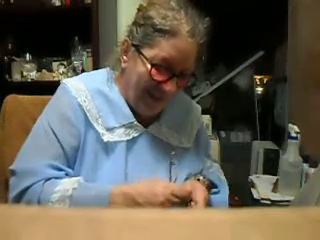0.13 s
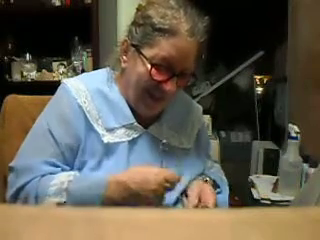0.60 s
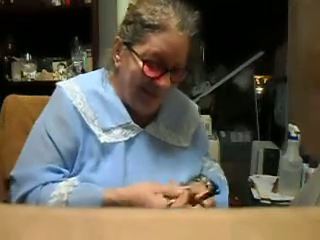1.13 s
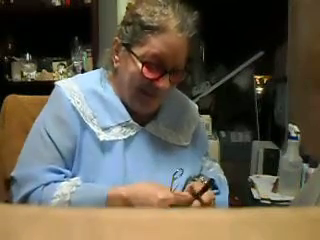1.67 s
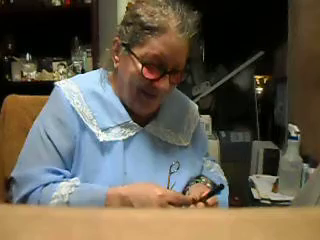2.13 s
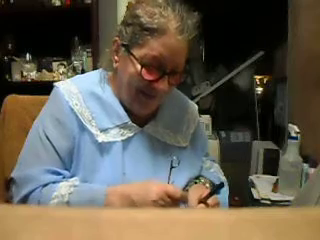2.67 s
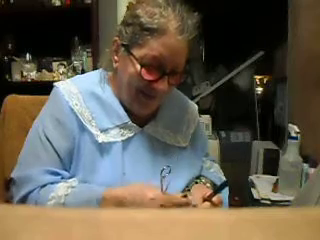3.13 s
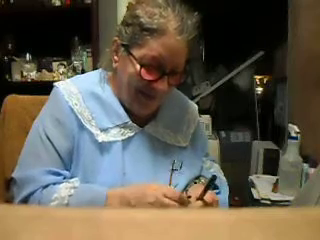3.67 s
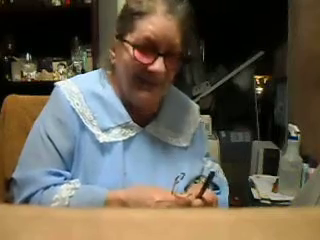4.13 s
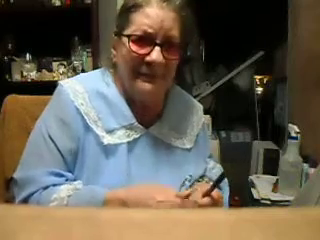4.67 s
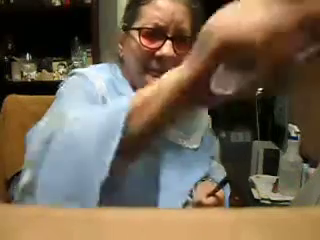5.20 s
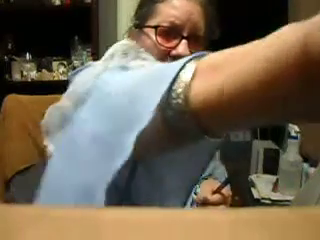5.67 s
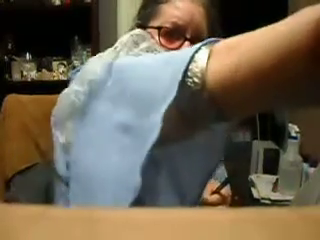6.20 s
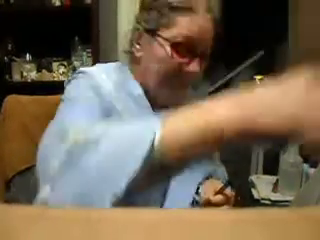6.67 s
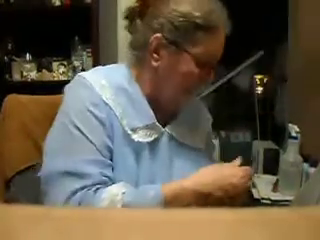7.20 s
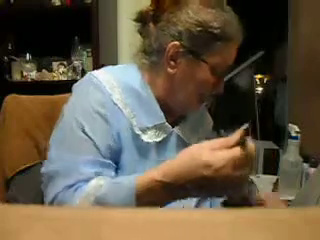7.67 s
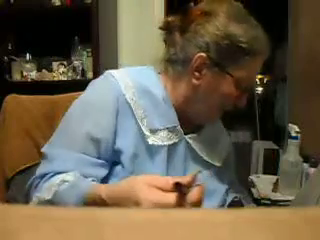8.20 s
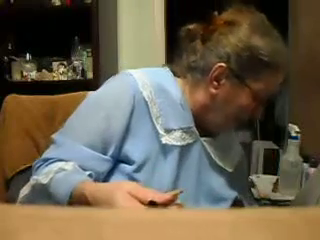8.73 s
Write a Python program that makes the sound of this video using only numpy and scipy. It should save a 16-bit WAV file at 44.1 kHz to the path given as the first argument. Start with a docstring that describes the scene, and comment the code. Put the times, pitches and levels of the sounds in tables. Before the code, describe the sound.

A quiet indoor room with a faint, fast, uneven clock tick, low hum and soft hiss. At a table, one crisp scissor snip stands out near the start, followed by sparse, tiny plastic snaps and faint crinkles. Later a small button clicks, fingers scrape the camera's casing, and a loud hollow knock rattles briefly against the microphone. Only the ticking and a few faint plastic sounds remain.

```python
"""A quiet room, heard through a camera's microphone: a pendulum clock ticks unevenly from start to end.
First, on a table, small scissors snip and stiff plastic crinkles, in splinters and dense tiny cracks of noise.
Then a button clicks and a hand reaches for the camera: fingers rub its shell, which rings, knocks hard and
rattles to rest; the gain control dips and creeps back. A few faint plastic sounds follow.
Appliance hum, electronic whine, room rumble and preamplifier hiss lie below throughout."""
import sys
import numpy as np
from scipy import signal
from scipy.fft import rfft, irfft, next_fast_len
from scipy.io import wavfile
from scipy.ndimage import uniform_filter1d

SR = 44100
rng = np.random.default_rng(int(sys.argv[2]) if len(sys.argv) > 2 else 0)


def dump(signal):
    """Clip the signal to [-1, 1] and save it as 16-bit WAV at the path in sys.argv[1]."""
    limited = np.clip(np.atleast_2d(signal).T, -1, 1)
    pcm = np.round(limited * 32767).astype(np.int16)
    wavfile.write(sys.argv[1], SR, pcm)


def level_to_linear(level):
    """Convert decibel levels to linear amplitude factors, elementwise."""
    exponent = np.asarray(level, float) / 20
    return 10 ** exponent


N = 389403  # samples

# Clearest snips and plastic snaps at the table, before room and microphone.
# Each row: start in seconds, peak of the bright band in dB, centre of that band in Hz.
TABLE_SNAPS = [(0.0427, -46, 8250), (0.3962, -17, 9400), (0.4092, -35, 8690), (0.4316, -36, 7300),
               (0.4682, -39, 8000), (1.5277, -51.5, 6030), (1.7519, -50.5, 7350), (1.7938, -52, 8600),
               (1.8543, -40.5, 9100), (1.8873, -45.5, 7900), (1.94, -50, 6460), (2.0108, -52, 9500),
               (2.1382, -39.5, 8460), (2.3493, -50.5, 7700), (2.4254, -46, 9350), (2.4586, -49, 8650),
               (2.7015, -47, 8850), (2.7806, -35.5, 8600), (2.88, -41.5, 8750), (3.0433, -53, 7560),
               (3.8186, -50, 7800), (4.2804, -51, 7800), (4.3879, -52, 8540), (4.4275, -44.5, 6900),
               (6.7017, -45.5, 7820), (7.8394, -46.5, 8870)]
# Swells of plastic crinkling between the fingers.
# Each row: start in seconds, length in seconds, level of the brightest part in dB.
CRINKLE_SWELLS = [(0, 0.14, -76), (.4, 0.1, -58), (1.69, 0.25, -69), (1.94, 0.28, -79), (2.33, 0.3, -78),
                  (2.65, 0.27, -81), (3.02, 0.029, -80), (3.78, 0.029, -74), (4.09, 0.05, -72.5),
                  (4.27, 0.08, -63), (4.38, 0.11, -76), (7.87, 0.38, -81.5)]
# Blows on the camera shell.
# Each row: start in seconds, relative strength in dB, hard crack relative to the blow in dB.
SHELL_BLOWS = [(5.7943, -48, -7), (6.1027, -42, -12), (6.24, -36.5, -7), (6.3652, -34, -9.5),
               (6.3973, -7, -6.5), (6.4150, -20, -25.5), (6.4577, -33.5, -22.5), (6.4741, -14.5, -15),
               (6.4814, -25, -16), (6.4895, -25, -16), (6.4977, -16, -20), (6.5224, -13.5, -13),
               (6.5500, -15, -23), (6.5655, -16.5, -17), (6.578, -33, -17), (6.5860, -24.5, -31),
               (6.6084, -36, -6)]
# Fingers rubbing the shell, one stroke a row.
# Each row: start in seconds, length in seconds, grains that ring the shell in dB, scraping rasp in dB.
FINGER_STROKES = [(5.865, 0.099, -81, -46), (5.903, 0.049, -83, -61), (5.93, 0.094, -89, -59),
                  (6.005, 0.045, -77, -39.5), (6.1, 0.12, -81, -76), (6.258, 0.046, -83, -55),
                  (6.31, 0.15, -86.5, -66), (6.475, 0.044, -58, -70), (6.545, 0.068, -63, -65),
                  (6.597, 0.046, -69.5, -66)]
# Ringing modes of the camera shell.
# Each row: frequency in Hz, relative level in dB, time to fall by 60 dB in seconds.
SHELL_MODES = [(153, -10, .06), (235, -4, 0.046), (293, -6, 0.03), (432, -8.5, 0.087), (435.5, -10, 0.055),
               (483, -4, 0.1), (531, -9, .04), (609, 0, 0.03), (712, -3.5, 0.023), (780, 3, 0.025),
               (920, -14.5, 0.03), (1067, -13.5, 0.014), (1410, -14.5, 0.015), (1610, -23, 0.0152),
               (1750, -9.5, 0.012), (2410, -29, 0.023)]
# Ringing modes of the clock case.
# Each row: frequency in Hz, relative level on the tick in dB, relative level on the tock in dB.
CLOCK_MODES = [(2704, 6.5, 2), (3630, -16.5, -33), (4910, -14, -15), (4805, 3, -3), (5750, 5.5, 2),
               (6070, 10.5, -1), (6430, -6, -3), (6880, 9.5, 0.5), (8780, -8.5, 5), (9820, 9, 2.5),
               (10300, -9, 2), (10920, -7, -26)]
# Steady hum of appliances. Each row: frequency in Hz, level before its waver in dB rms.
APPLIANCE_HUM = [(29.6, -69), (119.8, -69), (133.2, -78), (199.2, -77), (266.5, -92), (332.4, -86),
                 (399.7, -78)]
# Whine of the camera electronics. Each row: frequency in Hz, level before its waver in dB rms.
CAMERA_WHINE = [(3934, -82), (7867, -85)]
# Colour of room rumble and preamplifier hiss. Each row: frequency in Hz, relative density in dB per Hz.
AIR_COLOUR = [(6, -16), (10, -0.5), (34, 2.5), (91, -7.5), (130, -9.5), (222, -17.5), (368, -17),
              (403, -16), (440, -19.5), (600, -18.5), (1000, -23), (2000, -29), (3300, -33.5), (5550, -36),
              (8500, -36.5), (10200, -37.5), (11000, -41), (13000, -40.5)]


def rms_one(x):
    """Scales to an rms of 1."""
    return x / np.sqrt(np.mean(x ** 2) + 1e-20)


def peak_one(x):
    """Scales to a peak of 1."""
    return x / np.abs(x).max()


def band(x, low_hz, high_hz):
    """Keeps the band between two frequencies."""
    sos = signal.butter(2, [low_hz, min(high_hz, SR / 2.2)], "band", fs=SR, output="sos")
    return signal.sosfilt(sos, x)


def add(out, start_s, sound):
    """Lays a sound into the mix from its start, cut at the end."""
    i = round(start_s * SR)
    out[i:i + len(sound)] += sound[:N - i]


def swells(rows):
    """Gain that rises smoothly and sinks again for each row of start, length and dB."""
    out = np.zeros(N)
    for start_s, length_s, db in rows:
        add(out, start_s, level_to_linear(db) * signal.windows.tukey(int(length_s * SR), .6))
    return out


def grains(per_s, spread_db):
    """Random clicks of uneven size and either sign, with an rms of 1."""
    sizes = level_to_linear(spread_db * np.minimum(rng.exponential(1, N), 5)) * rng.choice([-1, 1], N)
    return rms_one(sizes * (rng.random(N) < per_s / SR))


def cracks(times, levels_db, decay_s):
    """Short splinters of noise that die away exponentially."""
    out, t = np.zeros(N), np.arange(900) / SR
    noises = rng.standard_normal((len(times), len(t)))
    for start_s, db, noise in zip(times, levels_db, noises):
        add(out, start_s, level_to_linear(db) * noise * np.exp(-t / decay_s))
    return out


def ring(clicks, hz, t60_s):
    """Damped resonance: a unit click sets a sine of height 1 ringing."""
    radius, angle = level_to_linear(-60 / (t60_s * SR)), 2 * np.pi * hz / SR
    poles = [1, -2 * radius * np.cos(angle), radius * radius]
    return signal.lfilter([0, np.sin(angle)], poles, clicks + 1e-18)


def drift(knots_per_s):
    """Slow random wander through knots of spread 1."""
    knots = rng.standard_normal(int(N / SR * 40) + 3)
    return np.interp(np.arange(N) / SR * knots_per_s, np.arange(len(knots)), knots)


def snaps():
    """Each snip or snap is a millisecond splinter with a bright band, a lower band and a faint body."""
    out, t = np.zeros(N), np.arange(600) / SR
    for start_s, db, hz in TABLE_SNAPS:
        # lower band relative to the bright one: weaker in louder snaps, with 3.5 dB of spread
        low_db = -7.5 - .25 * (db + 50) + 3.5 * rng.standard_normal()
        splinter = rng.standard_normal(len(t)) * np.exp(-t / 0.00098)
        bright = peak_one(band(splinter, hz * 0.75, hz * 1.28))
        low = peak_one(band(splinter, 3780, 7300))
        body = peak_one(band(splinter, 340, 4100))
        add(out, start_s, level_to_linear(db) * (bright + level_to_linear(low_db) * low + level_to_linear(-20) * body))
    return out


def crinkle():
    """Folding plastic gives dense tiny cracks, brightest near 9 kHz."""
    cracking = grains(1800, 5.2)
    sound = rms_one(band(cracking, 7600, 10400))
    for db, low_hz, high_hz in [(-6.5, 1900, 4900), (-8.5, 3630, 5700), (-11, 450, 1600)]:
        sound = sound + level_to_linear(db) * rms_one(band(cracking, low_hz, high_hz))
    return swells(CRINKLE_SWELLS) * sound


def camera_shell():
    """Blows and rubbing grains ring one shell; returns ring with thud, then hard cracks with rasp."""
    start_s, db, crack_db = np.transpose(SHELL_BLOWS)
    rub_s, length_s, rub_db, rasp_db = np.transpose(FINGER_STROKES)
    friction = grains(3500, 3.0)
    rub = swells(zip(rub_s, length_s, rub_db)) * friction
    # light strokes hardly move the lowest modes
    heavy_db = rub_db + 0.49 * (rub_db + 66.5)
    heavy_rub = swells(zip(rub_s, length_s, heavy_db)) * friction
    # a loose part inside strikes back after about 3 ms, sooner after a very hard blow
    delay_s = np.interp(db, [-14, -7], [.003, .0018]) * rng.uniform(.93, 1.07, len(db))
    blow_at = np.round(start_s * SR).astype(int)
    rebound_at = np.round((start_s + delay_s) * SR).astype(int)

    ringing = np.zeros(N)
    for hz, mode_db, t60_s in SHELL_MODES:
        strength_db = db - 10 + rng.normal(0, 3, len(db))
        if hz > 900:  # a harder crack excites the high modes more
            strength_db += .5 * (crack_db + 16)
        if hz < 350:  # weak blows excite the low modes less
            strength_db += .3 * np.minimum(db + 25, 0)
        push = (heavy_rub if hz < 350 else rub).copy()
        push[blow_at] += level_to_linear(strength_db)
        push[rebound_at] += level_to_linear(-4.5) * level_to_linear(strength_db)
        ringing += level_to_linear(mode_db) * ring(push, hz, t60_s)
    ringing = band(band(ringing, 200, 3200), 60, 4100)
    # low push that a blow sends through the camera
    thud = level_to_linear(-1) * band(band(cracks(start_s, db, .006), 20, 220), 20, 220)

    crack = cracks(start_s, db + crack_db, 0.001)
    hard = level_to_linear(6) * band(crack, 1550, 2200) + level_to_linear(-8.5) * band(crack, 2300, 2900)
    hard += level_to_linear(2.5) * band(crack, 3200, 4700) + level_to_linear(3.5) * band(crack, 7400, 10200)
    rasp = swells(zip(rub_s, length_s, rasp_db)) * grains(4000, 2.5)
    scrape = band(rasp, 1400, 2200) + 0.29 * band(rasp, 3300, 3600)
    scrape += 0.66 * band(rasp, 900, 1500) + level_to_linear(-19) * band(rasp, 4000, 10500)
    return ringing + thud, hard + scrape


def button():
    """A small plastic part on the camera gives one crisp click, a splinter of noise in a middle band."""
    start_s, peak_db = 5.5475, -39
    return level_to_linear(peak_db) * peak_one(band(cracks([start_s], [0], 0.00076), 2500, 4800))


def clock():
    """The escapement lands with a strike and short chatter that ring the case; tick and tock fall unevenly."""
    first_tick_s, swing_s, tock_after_s = .0525, .44791, .2385
    case_t60_cycles = 190
    out, t = np.zeros(N), np.arange(2500) / SR
    tick = (-95.5, .002, .02)  # ringing level in dB, chatter rise in s, chatter fall in s
    tock = (-87.5, .005, .016)
    for side, (ring_db, rise_s, fall_s) in enumerate([tick, tock]):
        chatter, strikes = np.zeros(N), np.zeros(N)
        shape = (1 - np.exp(-t / rise_s)) * np.exp(-t / fall_s)
        for beat_s in np.arange(first_tick_s + side * tock_after_s, N / SR, swing_s):
            jitter_s, jitter_db = rng.normal(0, [.001, 1.1])
            # the chatter sets in 2 ms before the strike
            add(chatter, beat_s - .002 + jitter_s, level_to_linear(jitter_db) * shape * rng.standard_normal(len(t)))
            add(strikes, beat_s + jitter_s, level_to_linear(np.array([jitter_db + 18.5])))
        push = strikes + .6 * chatter
        for mode in CLOCK_MODES:
            hz, mode_db = mode[0], mode[1 + side]
            out += level_to_linear(ring_db + mode_db) * ring(push, hz, case_t60_cycles / hz)
        out += level_to_linear(-57.5) * band(chatter, 2070, 11000)
    return out


def room(x, low_hz):
    """Dense reflections begin after 2 ms and die away by 60 dB in a tenth of a second."""
    t60_s = 0.1
    t = np.arange(SR // 2) / SR
    tail = rng.standard_normal(len(t)) * level_to_linear(-60 * t / t60_s) * (t > .002)
    return signal.fftconvolve(x, band(tail / np.linalg.norm(tail), low_hz, 13000))[:N]


def tones(lines, waver_db):
    """Appliances and electronics give steady sines whose level wavers a little."""
    t, out = np.arange(N) / SR, np.zeros(N)
    for hz, db in lines:
        level = np.sqrt(2) * level_to_linear(db + waver_db * drift(2.7))
        out += level * np.sin(2 * np.pi * (hz * t + rng.random()))
    return out


def air():
    """Room rumble and preamplifier hiss are one smooth noise, coloured in the spectrum."""
    level_db = -58.5  # rms
    size = next_fast_len(N)
    hz, db = np.transpose(AIR_COLOUR)
    bins_hz = np.arange(size // 2 + 1) * SR / size
    colour = level_to_linear(np.interp(np.log(bins_hz + 1), np.log(hz), db))
    noise = irfft(rfft(rng.standard_normal(size)) * colour, size)[:N]
    return level_to_linear(level_db) * rms_one(noise)


def scene():
    """Table sounds and camera handling with their reflections, over the clock and the quiet room."""
    table = snaps() + crinkle()
    shell, hard = camera_shell()
    click = button()
    # the table excites the room far more than the handling close to the microphone
    to_room = level_to_linear(0.5) * table + level_to_linear(-15.5) * hard + level_to_linear(-16.5) * shell + level_to_linear(-13) * click
    near = table + shell + hard + click + room(to_room, 300)
    background = clock() + tones(APPLIANCE_HUM, 1.3) + tones(CAMERA_WHINE, 1.7) + air()
    return (near + background)[None]


def top_cut(x):
    """Nothing passes above the cut-off."""
    return signal.sosfilt(signal.butter(12, 12550, fs=SR, output="sos"), x)


def record(dry):
    """Gain control eases down on loud sound and creeps back; the microphone falls off steeply at the top."""
    threshold_db, cut_per_db, most_cut_db = -37.0, 0.42, 4.5
    recovery_db_per_s, ease_s = 3.43, .08
    level_db = 10 * np.log10(uniform_filter1d(dry[0] ** 2, size=2048) + 1e-12)
    cut_db = np.clip(cut_per_db * (level_db - threshold_db), 0, most_cut_db)
    # hold the deepest cut so far, less what has been recovered since
    creep_db = recovery_db_per_s * np.arange(N) / SR
    held_db = np.maximum.accumulate(cut_db + creep_db) - creep_db
    r = np.exp(-1 / (ease_s * SR))
    levelled = dry * level_to_linear(-signal.lfilter([1 - r], [1, -r], held_db))

    edge_hz = 11100
    steep = signal.cheby2(12, 70, edge_hz * 1.077, fs=SR, output="sos")
    # a weak band of treble remains above the edge
    mix = signal.sosfilt(steep, levelled) + level_to_linear(-14) * band(levelled, edge_hz, 12490)
    return top_cut(mix)


dry = scene()
out = record(dry)
dump(out)
```